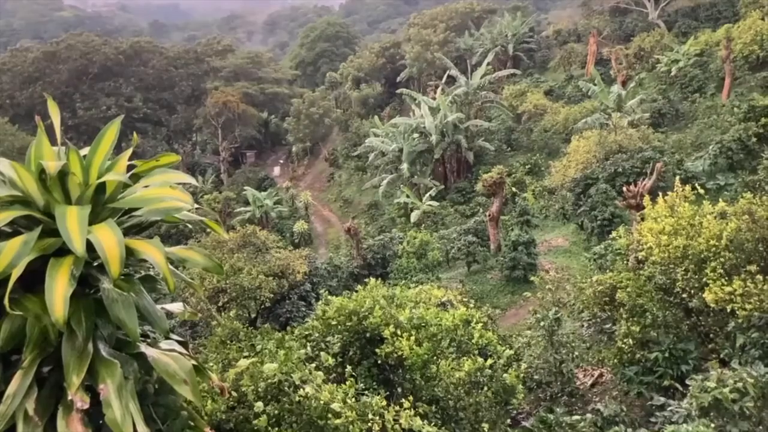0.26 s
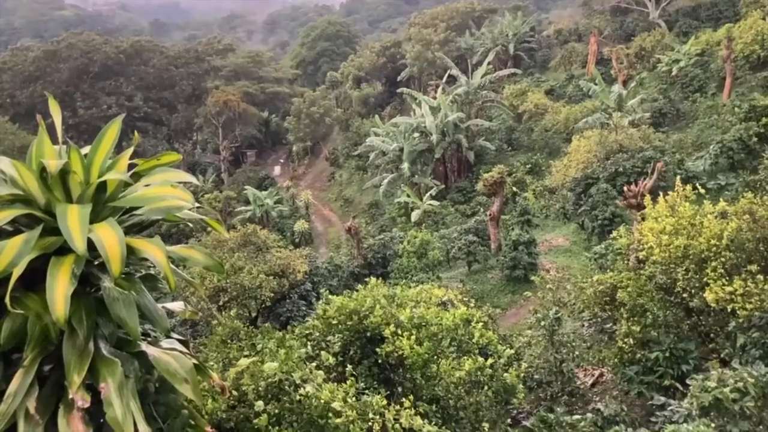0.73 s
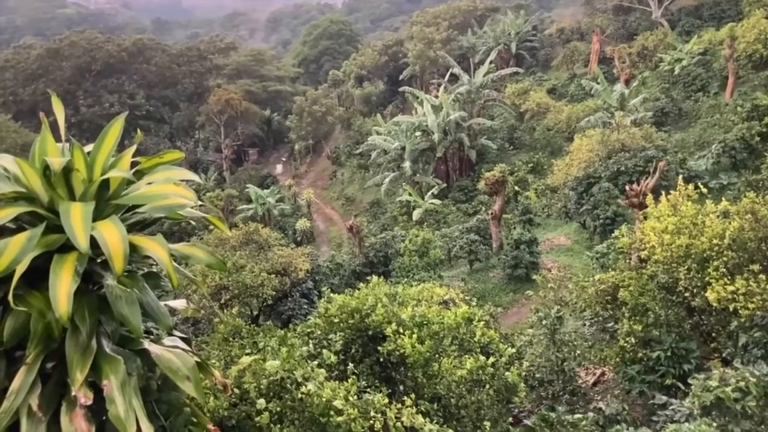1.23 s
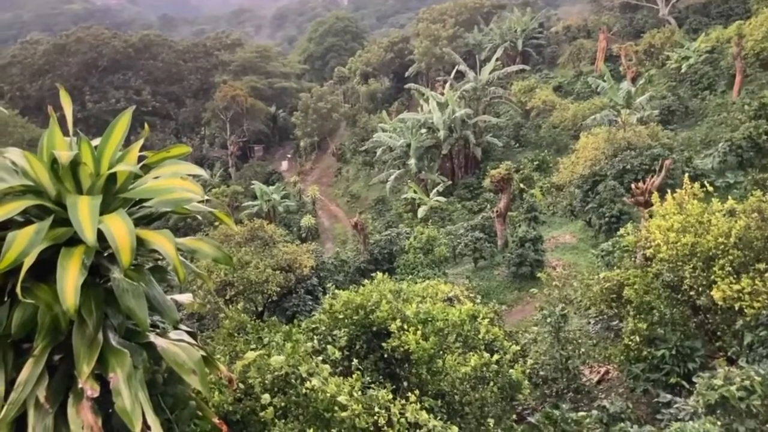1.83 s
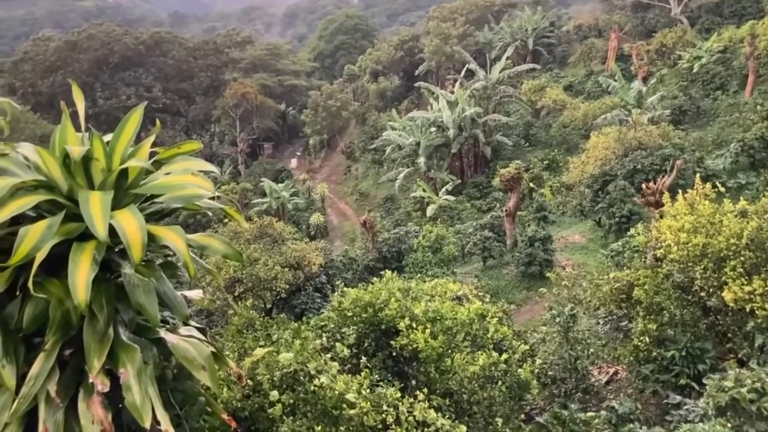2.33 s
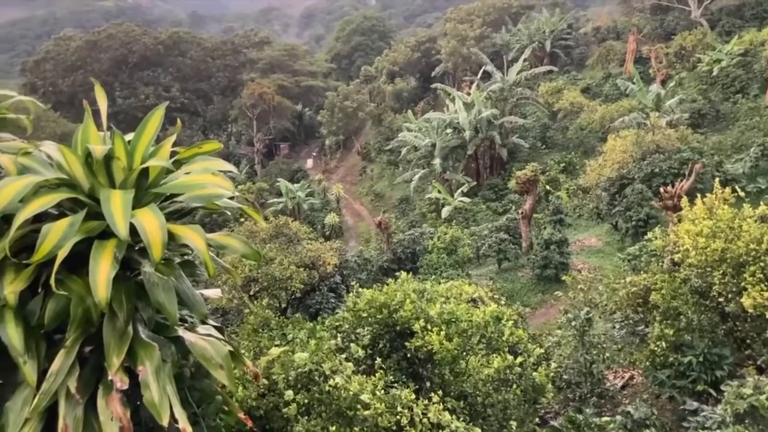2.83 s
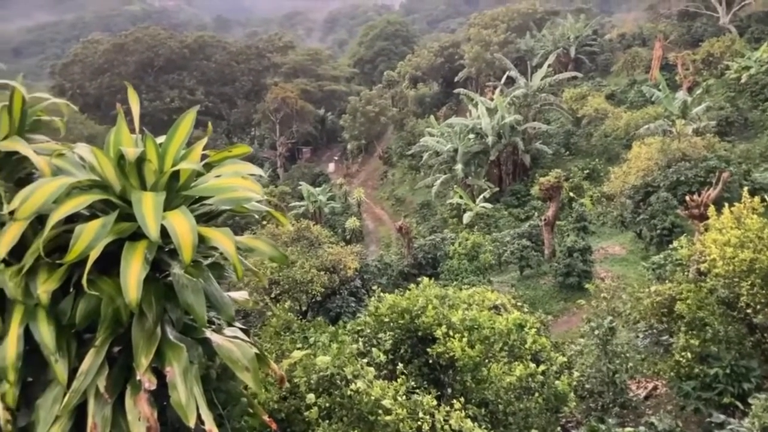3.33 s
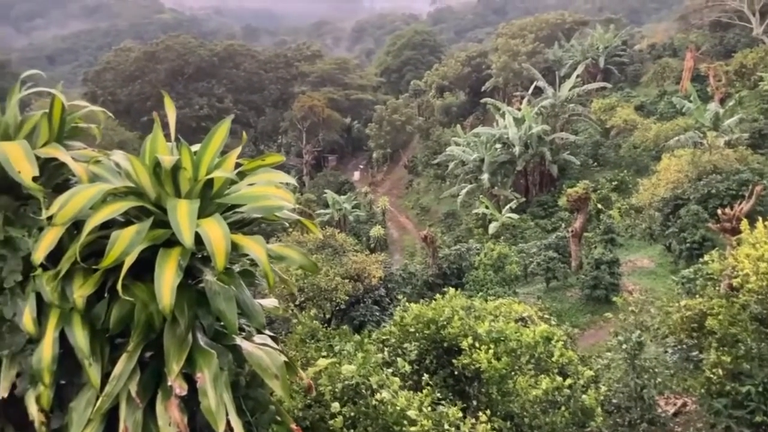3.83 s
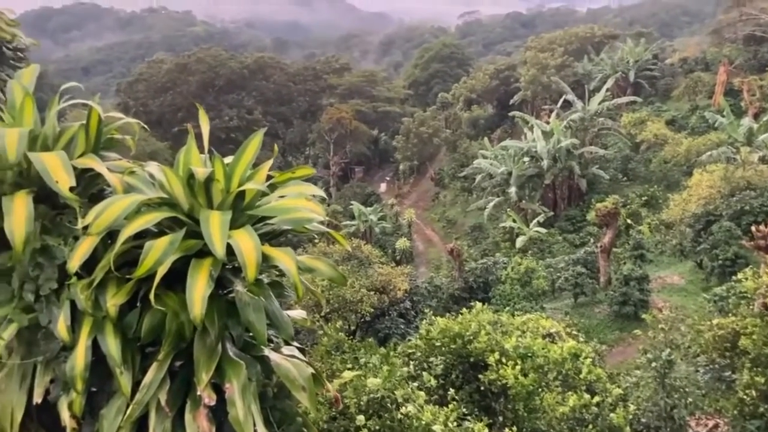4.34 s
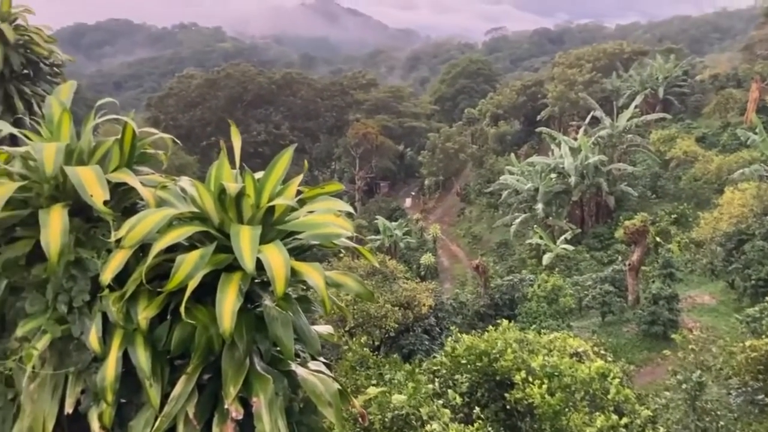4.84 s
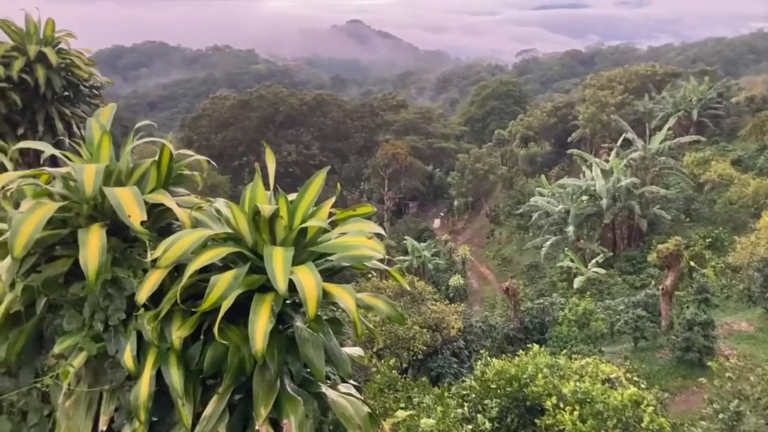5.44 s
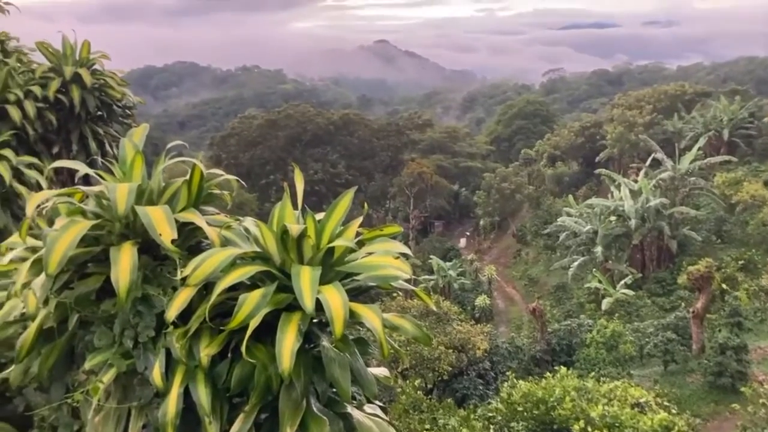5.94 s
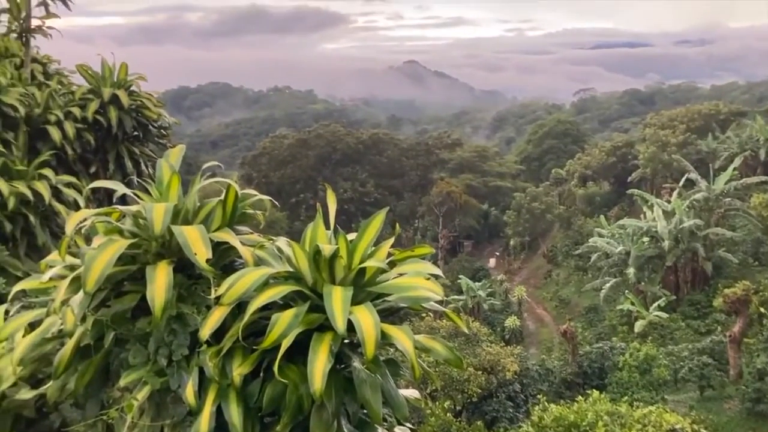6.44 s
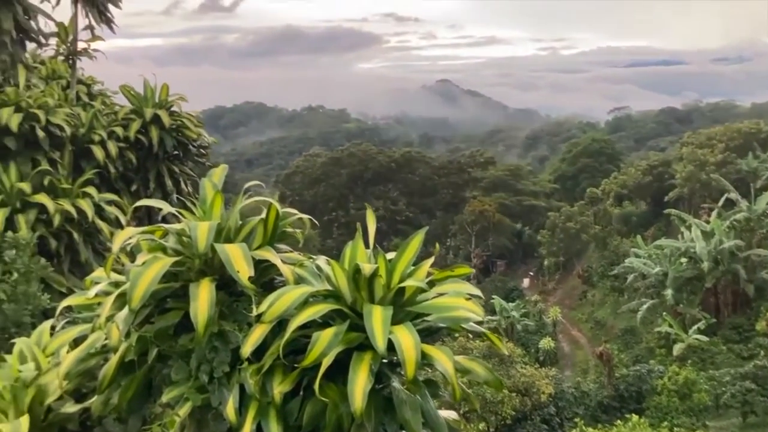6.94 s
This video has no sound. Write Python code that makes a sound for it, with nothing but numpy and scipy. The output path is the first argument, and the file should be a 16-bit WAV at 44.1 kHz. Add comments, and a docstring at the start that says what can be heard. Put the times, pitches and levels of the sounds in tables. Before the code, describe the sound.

A steady, shrill insect chorus in a forested valley over the low drone of distant engines, with a few faint hen clucks.

```python
"""A shrill insect chorus fills a wooded valley at dusk, and one nearer singer buzzes in phrases.
Wing strokes pulse each insect's tone, and the leaves scatter it. Three far engines drone at harmonics
of their firing rates, two close enough to beat. A hen clucks, struck metal rings down in its modes,
small things tick nearby and thin chirps pass, over a far road's wash and the steady air."""
import sys
import numpy as np
from scipy import signal
from scipy.io import wavfile
from scipy.ndimage import uniform_filter1d

SR = 44100
rng = np.random.default_rng(int(sys.argv[2]) if len(sys.argv) > 2 else 0)


def dump_mix(stems):
    """Bounce the given channels to the path in sys.argv[1] as a 16-bit WAV at rate SR."""
    frames = np.atleast_2d(stems).T  # one column per channel
    limited = np.clip(frames, -1, 1)  # hard clip at full scale
    pcm = np.round(limited * 32767).astype(np.int16)
    wavfile.write(sys.argv[1], SR, pcm)


N = 316638
T = np.arange(N) / SR

# Insect kinds, low to high: lowest f/Hz, highest f/Hz, level/dB of the lowest and of the highest singer
# re the middle, pulse rate/Hz, duty cycle, throb rate/Hz, throb depth
INSECT_KINDS = [(4110, 4210, -3, 0, 80, .8, 6, .3), (4200, 4540, -9, -7, 81, .8, 9, .3),
                (4620, 5040, -5, -2, 50, .4, 6, .3), (5120, 5750, -16, 0, 93, .85, 18.5, .42),
                (9380, 9560, -2, -3, 60, .4, 9, .5), (10700, 10950, -2, -2, 60, .4, 9, .5)]
# Joint phrases of kinds 1 and 2: t/s, duration/s, level/dB of kind 1, level/dB of kind 2
PAIRED_PHRASES = [(0.033, 0.96, -61.5, -59.5), (2.053, .92, -76, -57), (4.075, 0.9, -74, -58),
                  (6.05, 0.78, -69, -60.5)]
# Murmur of kind 2 and held song of kind 4, the loudest: t/s, level/dB
MURMUR = [(0, -59), (3.5, -57.5), (5.4, -61.5), (7.18, -56)]
HELD_SONG = [(0, -47.5), (2.5, -46), (5, -47), (7.18, -47)]
# Surges of kind 3 and phrases of the faint kinds 5 and 6: t/s, duration/s, level/dB
SURGES = [(.05, .3, -60), (.72, .3, -55), (1.45, 0.24, -61), (2.02, 0.25, -58), (2.52, 0.31, -61),
          (3.02, .28, -59), (3.6, 0.32, -61), (4.15, 0.38, -59), (4.6, 0.37, -57), (5.12, .35, -56.5),
          (6.08, .25, -58), (6.5, 0.36, -57)]
HIGH_PHRASES = [(.05, .25, -75), (.4, .7, -80), (2.55, 0.41, -80), (3.2, 0.79, -80), (4.45, 0.47, -80),
                (5.3, 0.47, -83), (6.4, 0.46, -82)]
HIGHEST_PHRASES = [(.55, .26, -77), (1.57, .3, -76), (2.85, 0.25, -81), (3.93, .26, -78), (5.12, 0.27, -78),
                   (6.56, 0.24, -79)]
def chorus(edge_s=.086, step=16):
    """Amplitude modulation: each kind's summed pulses ride on a carrier at its middle pitch."""
    start, length, first_db, second_db = np.transpose(PAIRED_PHRASES)
    efforts = [phrases(zip(start, length, first_db), edge_s, rest_db=-71.5),
               phrases(zip(start, length, second_db), edge_s, rest_db=contour(MURMUR)),
               phrases(SURGES, edge_s, rest_db=-56),
               gain_of(contour(HELD_SONG)),
               phrases(HIGH_PHRASES, edge_s, rest_db=-93),
               phrases(HIGHEST_PHRASES, edge_s, rest_db=-93)]
    out = np.zeros(N)
    for (low_hz, high_hz, *song), effort in zip(INSECT_KINDS, efforts):
        envelope = signal.resample_poly(singers((high_hz - low_hz) / 2, *song, step), step, 1)[:N]
        carrier = np.exp(1j * np.pi * (low_hz + high_hz) * T)
        out += effort * unit_rms((envelope * carrier).real)
    return out


def singers(half_band_hz, lowest_db, highest_db, pulse_hz, duty, throb_hz, depth, step, count=20):
    """Incoherent sum: wing pulses, each singer at its own pitch and pace, form a complex envelope."""
    t, out = T[::step], 0
    for place in np.linspace(-1, 1, count):
        pace, pulse_phase, throb_pace, throb_phase = rng.random(4)
        cycle = (pulse_hz * (1 + .08 * (pace - .5)) * t + pulse_phase) % 1
        stroke = np.sin(np.pi * np.minimum(cycle / duty, 1)) ** 2
        throb_turns = throb_hz * (1 + .0583 * (throb_pace - .5)) * t + throb_phase
        throb = 1 + depth * np.sin(2 * np.pi * throb_turns)
        turns = np.cumsum(place * half_band_hz + 40 * drift(16, step)) * step / SR
        level_db = lowest_db * max(-place, 0) + highest_db * max(place, 0) + .38 * drift(4, step, .202)
        song = gain_of(level_db) * throb * stroke * np.exp(2j * np.pi * turns)
        out = out + .83 * song + foliage(song, t60=.14, rate=SR / step)
    return out


# Phrases of the nearer singer: t/s, duration/s, level/dB
BUZZ_PHRASES = [(.3, .39, -68), (.98, .32, -66), (2.48, 0.42, -71), (5.01, 0.68, -67), (6.37, 0.2, -69),
                (6.72, 0.22, -73)]
def buzz(wing_hz=6345, stroke_hz=158, sharpness=.85):
    """Sidebands: regular strokes of uneven strength split a wing tone into a raspy comb of lines."""
    stroke_turns = np.cumsum(stroke_hz + 9.4 * drift(4)) / SR
    strokes = np.exp(sharpness * np.cos(2 * np.pi * stroke_turns))
    uneven = gain_of(3 * drift(90, slowest=.15))
    tone = np.sin(2 * np.pi * np.cumsum(wing_hz + 28 * drift(60, slowest=.1)) / SR)
    return unit_rms(strokes * uneven * tone) * phrases(BUZZ_PHRASES, edge_s=.035)


# Running of the three engines: t/s, firing f/Hz, level/dB
NEAR_ENGINE = [(0, 81.6, -46), (.3, 82.1, -39.5), (1.2, 84.5, -40.5), (2, 86.5, -42.5), (3, 85.5, -47.5),
               (4, 83, -47), (4.7, 81.5, -44), (5.5, 83, -51), (6.4, 84, -42), (7.18, 85, -44.5)]
IDLING_ENGINE = [(0, 76.54, -54), (1.3, 77.34, -52.5), (3, 78.36, -57.5), (5, 78.3, -52.5),
                 (6.2, 77.28, -53), (7.18, 76.75, -52)]
SLOWING_ENGINE = [(0, 66.4, -51.5), (.5, 65.7, -52.5), (1, 64.8, -57), (2, 62.8, -56.5), (3, 59.18, -56),
                  (4, 57.96, -60.5), (5, 57.68, -58), (6, 58.61, -55), (7.18, 58.2, -58)]
# Their orders: multiple of the firing rate, level/dB re the engine's level
NEAR_ORDERS = [(1, -4), (2, -9.5), (3, -25)]
IDLING_ORDERS = [(1, -4), (2, -3.5), (3, -12), (4, -19)]
SLOWING_LOW = [(1, -4), (2, 2.5), (3, -4.5)]
SLOWING_HIGH = [(3, -1), (4, -5.5), (5, -1.5), (6, -13), (7, -15.5)]
# Rise of the slowing engine's high orders as it turns: t/s, gain/dB
RASP = [(0, -16), (2.8, -10.5), (3.6, 3), (5.3, -2.5), (5.9, 2.5), (7.18, -1)]
# Quickening throb of the nearest engine: t/s, rate/Hz, depth
THROB = [(0, 2.6, 0.44), (1, 3.63, 0.2), (3.8, 4.28, 0.4), (4.1, 4.43, 0)]
def engines(first_dip_s=.078):
    """Beating: two engines run close in speed, the nearer one throbbing; a third slows down."""
    times, throb_hz, depth = np.transpose(THROB)
    turns = np.cumsum(np.interp(T, times, throb_hz)) / SR - throb_hz[0] * first_dip_s
    throb = 1 - np.interp(T, times, depth) * np.cos(2 * np.pi * turns)
    near = engine(NEAR_ENGINE, NEAR_ORDERS, waver_hz=.26, flutter_db=1.7)
    idling = engine(IDLING_ENGINE, IDLING_ORDERS, waver_hz=.58, flutter_db=2.4)
    slowing = engine(SLOWING_ENGINE, SLOWING_LOW, waver_hz=.43, flutter_db=2.7)
    rasp = engine(SLOWING_ENGINE, SLOWING_HIGH, waver_hz=.54, flutter_db=2.3)
    return throb * near + idling + slowing + gain_of(contour(RASP)) * rasp


def engine(running, orders, waver_hz, flutter_db):
    """Harmonic series of the firing rate; uneven firing and the long air path make each order waver."""
    times, hz, db = np.transpose(running)
    turns = np.cumsum(np.interp(T, times, hz) + waver_hz * drift(12, slowest=.25)) / SR
    harmonics = sum(gain_of(order_db + flutter_db * drift(14, slowest=.2)) * partial(k * turns)
                    for k, order_db in orders)
    return np.sqrt(2) * gain_of(np.interp(T, times, db)) * harmonics


# Clucks: t/s, level/dB, top pitch f/Hz, duration/s, tilt/(dB per octave)
CLUCKS = [(1.96, -59.5, 394.6, 0.036, -2), (2.001, -59, 366, 0.031, -4), (2.26, -57.5, 440, 0.04, -4),
          (3.224, -60, 387, 0.023, -5), (4.063, -55, 393, 0.041, -5.5), (4.832, -56.5, 404, 0.035, -2),
          (5.332, -56, 422, 0.037, 1)]
# Resonances of the beak: f/Hz, gain/dB
BEAK_RESPONSE = [(400, -16), (800, -9), (1200, 0), (1700, -4.5), (2100, -1.5), (2600, -20), (3400, -23)]
def hen():
    """Source and filter: the beak shapes hoarse harmonics of an arching pitch; the slope echoes them."""
    out = np.zeros(N)
    for start, db, hz, length, tilt_db in CLUCKS:
        progress = np.linspace(0, 1, round(length * SR))
        turns = np.cumsum(hz * (1 - .365 * (progress - .55) ** 2)) / SR
        voice = sum(gain_of(spectrum_db(BEAK_RESPONSE, k * hz) + tilt_db * np.log2(k / 3))
                    * partial(k * turns) for k in range(1, 9))
        hoarse = 1 + .65 * smooth_noise(len(voice), width=70)
        add(out, start, gain_of(db) * unit_rms(voice * hoarse) * signal.windows.tukey(len(voice), .6))
    return out + gain_of(-4.5) * foliage(out, t60=.25)


# Modes of the metal: f/Hz, relative level/dB, t60/s
METAL_MODES = [(1104, -1, 7), (1211, -6, 3.5), (1233, -4, 4), (1297, -5, 4), (1642, -8, 3), (1685, -8, 3),
               (2213, -9, 2.8), (2261, -8, 2.8), (2573, -12, 4), (2622, -10, 3.5), (2742, -9, 3),
               (3250, -10, 3), (3430, -11, 2.5)]
def metal(level_db=-64):
    """Free decay: the modes of metal struck just before fade exponentially and flutter on the way."""
    out = np.zeros(N)
    for hz, db, t60 in METAL_MODES:
        flutter_db = 3.6 * drift(29.6, slowest=.34)
        out += gain_of(level_db + db - 60 * T / t60 + flutter_db) * partial(hz * T)
    return np.sqrt(2) * out


# Ticks: t/s, base level/dB, treble level/dB re the base
TICKS = [(.154, -63, 7), (1.143, -56, -23), (2.174, -59.5, -12), (2.317, -70, 12), (3.276, -69, 12),
         (3.447, -64, 3), (4.414, -54, -3), (4.793, -66, -20), (6.195, -68, 1)]
def ticks(knock_t60=.1, rustle_t60=.067, rustle_rise_s=.004):
    """Damped transients: a dull knock and a bright rustle, each a decaying band of noise."""
    out, t = np.zeros(N), np.arange(1500) / SR
    dull = signal.butter(3, [550, 1500], "bandpass", fs=SR, output="sos")
    bright = signal.butter(8, 8000, "highpass", fs=SR, output="sos")
    for start, db, treble_db in TICKS:
        noise = rng.standard_normal((2, len(t)))
        knock = unit_rms(signal.sosfilt(dull, noise[0])) * gain_of(4.5 - 60 * t / knock_t60)
        rustle = unit_rms(signal.sosfilt(bright, noise[1])) * gain_of(treble_db - 60 * t / rustle_t60)
        add(out, start, gain_of(db) * (knock + rustle * np.minimum(t / rustle_rise_s, 1)))
    return out


# Thin chirps: t/s, level/dB before roughening and scattering, f/Hz, duration/s
CHIRPS = [(1.745, -72, 9450, .07), (1.765, -75, 10050, .05), (6.245, -76, 3020, .025)]
def chirps():
    """Noise modulation roughens brief tones, and scattering by the leaves blurs them."""
    out = np.zeros(N)
    for start, db, hz, length in CHIRPS:
        t = np.arange(round(length * SR)) / SR
        rough_tone = (.84 + smooth_noise(len(t), width=140)) * np.sin(2 * np.pi * hz * t)
        add(out, start, gain_of(db) * rough_tone * signal.windows.tukey(len(t), .5))
    return out + 1.8 * foliage(out, t60=.11)


# Swell of the road: t/s, level/dB
ROAD_SWELL = [(0, -59.5), (1.2, -61.5), (3.4, -62), (3.8, -60.5), (5, -60.5), (6.6, -59), (7.18, -59.5)]
# Its spectrum: f/Hz, relative density level/dB
ROAD_SPECTRUM = [(250, -10), (450, 1), (600, 1.5), (1000, -3), (1500, -8.5), (2200, -22), (3000, -63)]
def road():
    """Band-limited noise: a far road merges into one slowly swelling wash."""
    return gain_of(contour(ROAD_SWELL)) * wash(ROAD_SPECTRUM, patchy_db=1.23, flicker_db=0)


# Spectrum of the steady air and hiss: f/Hz, relative density level/dB
AIR_SPECTRUM = [(25, -32), (45, -36), (60, -1.5), (150, -2), (300, -10.5), (420, -18), (900, -28),
                (1800, -28), (3800, -28), (6000, -24), (6200, -31.5), (6500, -102), (7400, -57),
                (7650, -35.5), (9900, -33), (10300, -37), (10800, -35), (11500, -36), (11900, -38),
                (15600, -39.5)]
def air(level_db=-52):
    """Noise floor: steady valley air and microphone hiss; the treble flickers."""
    return gain_of(level_db) * wash(AIR_SPECTRUM, patchy_db=1.47, flicker_db=1)


def wash(spectrum, patchy_db, flicker_db):
    """Spectral shaping: random short-time spectra with drifting patches sum to noise of rms 1."""
    frames, hz = N // 256 + 5, np.fft.rfftfreq(1024, 1 / SR)
    real, imag, patches = rng.standard_normal((frames, 513, 3)).T
    patches = unit_rms(uniform_filter1d(uniform_filter1d(patches, size=14, axis=0), size=16, axis=1))
    flicker = np.resize(drift(25, step=256), frames) * (hz[:, None] > 7000)
    level_db = spectrum_db(spectrum, hz)[:, None] + patchy_db * patches + flicker_db * flicker
    spectra = (real + 1j * imag) * gain_of(level_db)
    return unit_rms(signal.istft(spectra, nperseg=1024, noverlap=768)[1][:N])


def foliage(x, t60, rate=SR):
    """Scattering among leaves: convolution with a dying tail of random reflections, energy 1."""
    t = np.arange(round(rate / 3)) / rate
    tail = rng.standard_normal(len(t)) * gain_of(-60 * t / t60)
    return signal.fftconvolve(x, tail / np.linalg.norm(tail))[:len(x)]


def phrases(rows, edge_s, rest_db=-200):
    """Power addition: gains that rise, hold and fall combine with a resting level."""
    shapes = [gain_of(db) * np.clip(np.minimum(T - start, start + length - T) / edge_s, 0, 1)
              for start, length, db in rows]
    return np.sqrt(gain_of(rest_db) ** 2 + np.sum(np.square(shapes), axis=0))


def drift(rate_hz, step=1, slowest=.05):
    """Random fluctuation of rms 1, from slowest * rate_hz to rate_hz, one value every step samples."""
    t = T[::128]
    slow = sum(partial(hz * t) / np.sqrt(hz) for hz in rate_hz * np.geomspace(slowest, 1, num=14))
    return np.interp(T[::step], t, unit_rms(slow))


def partial(turns):
    """Sinusoid with a random starting phase."""
    return np.sin(2 * np.pi * (turns + rng.random()))


def smooth_noise(count, width):
    return unit_rms(uniform_filter1d(rng.standard_normal(count), size=width))


def contour(points):
    return np.interp(T, *np.transpose(points))


def spectrum_db(points, hz):
    f, db = np.transpose(points)
    return np.interp(np.log(hz + 1), np.log(f + 1), db)


def gain_of(db):
    return 10 ** (np.asarray(db) / 20)


def unit_rms(x):
    return x / np.sqrt(np.mean(x ** 2) + 1e-20)


def add(mix, start_s, sound):
    part = mix[round(start_s * SR):][:len(sound)]
    part += sound[:len(part)]


def scene():
    """Superposition: the pressures of all sources add in one channel."""
    return (chorus() + buzz() + engines() + metal() + hen() + ticks() + chirps() + road() + air())[None]


def record(dry, bass_cut_hz=48, band_edge_hz=15680):
    """Band limiting: the microphone cuts the deepest bass, and a steep low-pass the top treble."""
    highpass = signal.butter(4, bass_cut_hz, "highpass", fs=SR, output="sos")
    lowpass = signal.firwin(1023, band_edge_hz, window=("kaiser", 10), fs=SR)
    return signal.oaconvolve(signal.sosfilt(highpass, dry), lowpass[None], "same")


dry = scene()
out = record(dry)
dump_mix(out)
```